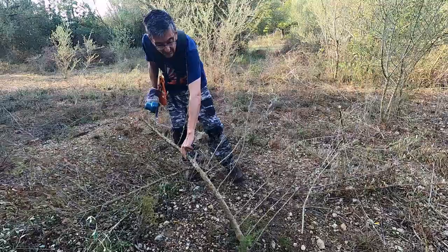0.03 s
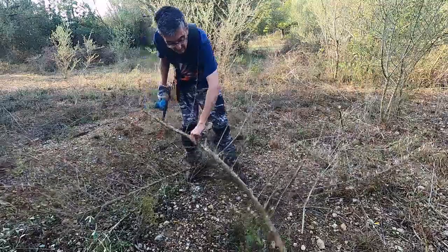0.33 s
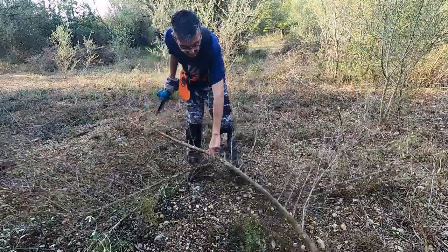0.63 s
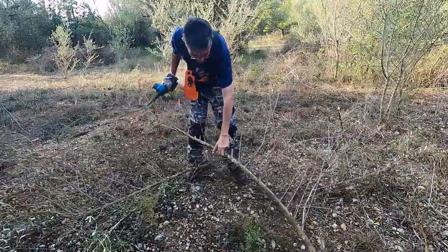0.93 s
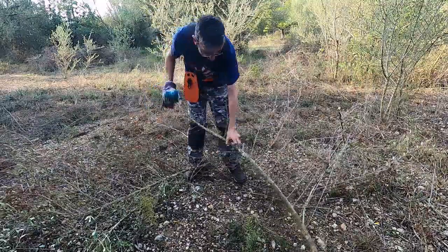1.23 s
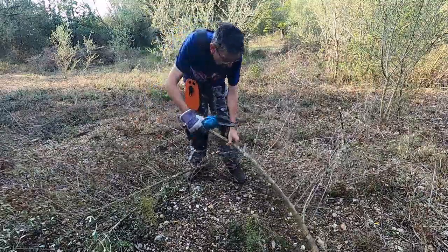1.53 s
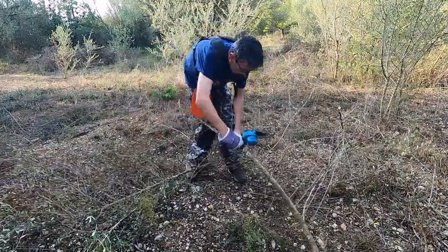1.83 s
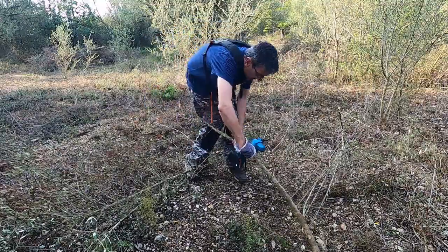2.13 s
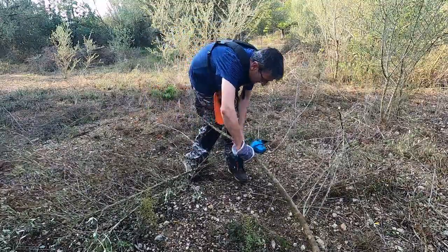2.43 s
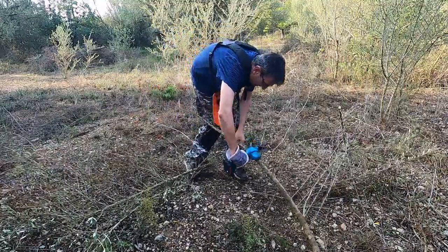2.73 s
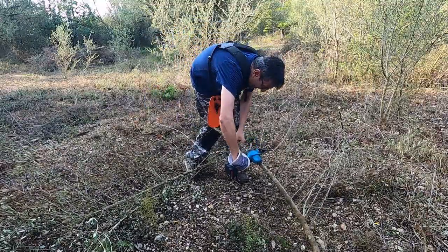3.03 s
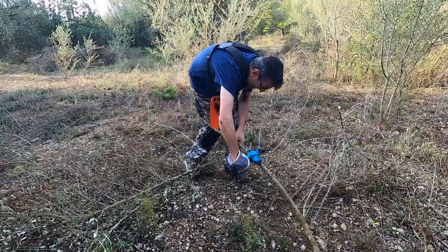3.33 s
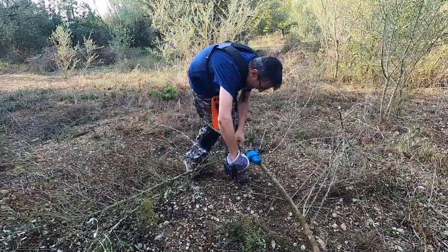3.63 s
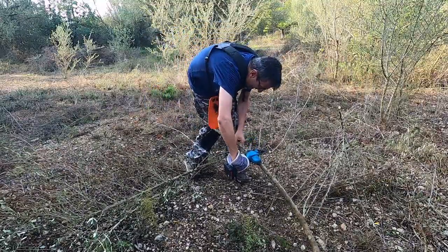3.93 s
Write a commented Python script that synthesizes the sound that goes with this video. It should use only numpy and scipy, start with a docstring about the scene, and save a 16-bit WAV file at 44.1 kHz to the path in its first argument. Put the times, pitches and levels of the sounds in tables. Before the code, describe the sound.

Battery mini chainsaw whirring, then chattering into wood, following rustling brush and snapping twigs.

```python
"""Wind rumbles on the microphone and far leaves hiss; dry brush crackles, twigs snap, small birds call.
A boot crunches into soil. A battery mini chainsaw spins up and runs free: links rattle along the
ringing bar over a sprocket tone and a gear whine. Then it sags as its teeth chatter into a branch,
now and then catching hard with a clank and a knock."""
import sys
import numpy as np
from scipy import signal
from scipy.fft import rfft, irfft
from scipy.io import wavfile

SR = 44100
rng = np.random.default_rng(int(sys.argv[2]) if len(sys.argv) > 2 else 0)


def dump(signal):
    """Clip the signal to [-1, 1] and save it as 16-bit WAV at the path in sys.argv[1]."""
    limited = np.clip(np.atleast_2d(signal).T, -1, 1)
    pcm = np.round(limited * 32767).astype(np.int16)
    wavfile.write(sys.argv[1], SR, pcm)


N = 176400
T, HZ = np.arange(N) / SR, np.fft.rfftfreq(N, 1 / SR)
EDGE_HZ = 15850


def amp(db):
    """dB to gain."""
    return 10 ** (np.asarray(db) / 20)


def unit(x):
    """Scale to rms 1."""
    return x / np.sqrt(np.mean(x ** 2) + 1e-20)


def peaking(x, db):
    """Scale to a peak level."""
    return amp(db) * x / abs(x).max()


def curve(points):
    """Interpolate (t/s, value) rows."""
    return np.interp(T, *np.transpose(points))


def swell(centre_s, half_s):
    """Gaussian envelope, 1/e at half_s from the centre."""
    return np.exp(-((T - centre_s) / half_s) ** 2)


def spectrum(points, column=1, hz=HZ):
    """Interpolate (f/Hz, values) rows over log frequency."""
    table = np.transpose(points)
    return np.interp(np.log(hz + 1), np.log(table[0]), table[column])


def colour(x, points, size=4096):
    """Minimum-phase filter from (f/Hz, level/dB) rows; keeps the power of white noise."""
    gain = amp(spectrum(points, hz=np.fft.rfftfreq(size, 1 / SR)))
    cepstrum = irfft(np.log(gain))
    cepstrum[1:size // 2] *= 2
    cepstrum[size // 2 + 1:] = 0
    impulse = irfft(np.exp(rfft(cepstrum)))
    return signal.fftconvolve(x, impulse / np.linalg.norm(impulse))[:N]


def resonate(x, hz, width_hz):
    """Unity-gain resonance; hz may vary."""
    carrier = np.exp(2j * np.pi * np.cumsum(hz * np.ones(len(x))) / SR)
    pole = np.exp(-np.pi * width_hz / SR)
    return 2 * (carrier * signal.lfilter([1 - pole], [1, -pole], x / carrier + 1e-18)).real


def drift(hz):
    """Low-passed noise, rms 1."""
    return unit(irfft(rfft(rng.standard_normal(N)) / (1 + (HZ / hz) ** 4), N))


def add(mix, start_s, sound):
    """Mix in at start_s."""
    part = mix[max(round(start_s * SR), 0):][:len(sound)]
    part += sound[:len(part)]


def stereo_noise(points, side):
    """Coloured mid/side noise."""
    mid, apart = rng.standard_normal((2, N))
    return np.array([colour(mid + sign * side * apart, points) for sign in (1, -1)])


WIND_SPECTRUM = [(15, -9), (42, 3.5), (75, -4), (135, -5.5), (320, -24), (3000, -73.5)]  # rumble: f/Hz, level/dB
WIND_LEVEL = [(0, -43.5), (1.4, -43.5), (1.62, -48), (4, -48.5)]  # wind strength: t/s, relative level/dB
def wind(gust_db=2):
    """Gusts rumble on the microphones, slightly louder on the left than on the right."""
    rumble = stereo_noise(WIND_SPECTRUM, side=0.15)
    return rumble * amp(curve(WIND_LEVEL) + gust_db * drift(6.6)) * amp([[.7], [-.7]])


LEAF_SPECTRUM = [(780, -3), (1050, 4), (1700, -1.5), (3500, -13), (6000, -17.5), (8500, -34), (15000, -43)]  # leaf wash: f/Hz, level/dB
LEAF_LEVEL = [(.85, -57.5), (1.45, -48.5), (1.66, -55), (1.9, -50)]  # its swells: t/s, level/dB
def leaves(flicker_db=0.98):
    """Far leaves merge into a wide wash."""
    return stereo_noise(LEAF_SPECTRUM, side=0.45) * amp(curve(LEAF_LEVEL) + flicker_db * drift(25))


RUSTLES = [(0.056, 0.03, -51), (0.288, 0.3, -54.5), (0.644, 0.095, -59), (1.02, 0.016, -46),
           (1.208, 0.011, -52), (1.774, 0.056, -52)]  # brush dragged or trodden on: centre t/s, half-width/s, level/dB
BRUSH_SPECTRUM = [(400, -8), (1400, 4), (5500, -6), (8500, -19.5), (15000, -32)]  # dry crackle: f/Hz, level/dB
def brush(crackles_per_s=800, spread_db=4.5):
    """Dry stalks crackle in short swells."""
    grains = (rng.random(N) < crackles_per_s / SR) * rng.choice([-1, 1], N)
    grains = grains * amp(spread_db * rng.exponential(1, N).clip(0, 4))
    envelope = sum(amp(db) * swell(s, half_s) for s, half_s, db in RUSTLES)
    return colour(unit(grains) * envelope, BRUSH_SPECTRUM)


SNAPS = [(0.074, -24, 527, -2.5, -11), (0.078, -32, 530, 1, -13), (0.157, -33, 1100, -9, -16),
         (0.284, -29.5, 1050, 11.5, -2), (0.368, -33, 2270, -24, -10), (0.376, -27, 2540, -37, -6),
         (1.299, -23, 2620, -16, -8.5), (1.518, -33.5, 1300, -4, -13), (1.754, -28, 595, 2, -2),
         (1.824, -31, 885, 3.5, -11), (2.103, -32, 1100, -9.5, -7)]  # twigs snapping: t/s, peak/dB, ring f/Hz, bass/dB, treble/dB
TICKS = [(0.258, -32.5), (0.348, -40.5), (0.418, -37), (0.811, -37.5), (1.796, -35.5), (1.829, -51),
         (1.876, -46), (2.045, -41.5)]  # thin stalks breaking: t/s, peak/dB
STALK_SPECTRUM = [(1500, -10), (5200, 6.5), (8500, -9.5), (15000, -22.5)]  # stalk tick: f/Hz, level/dB
def twigs(strain_s=.003, crack_s=0.0014, shed_s=0.01, splinter_db=-17, ring_db=10):
    """A bent twig splinters, cracks, rings and sheds more splinters. Thin stalks only tick."""
    out = np.zeros(N)
    t = T[:SR // 10] - T[SR // 20]  # zero at the crack

    def fracture():
        crack, splinters = rng.standard_normal((2, len(t)))
        crack = np.sign(crack) * np.exp(-abs(t) / crack_s) * (t >= 0)
        splinters = unit(splinters ** 3) * np.exp(-abs(t) / np.where(t < 0, strain_s, shed_s))
        return crack + amp(splinter_db) * splinters
    for s, db, ring_hz, bass, treble in SNAPS:
        burst = fracture()
        burst += amp(ring_db) * resonate(burst, ring_hz, width_hz=140)
        shape = [(650, bass), (1450, 0), (3400, treble - 3), (5200, treble), (EDGE_HZ, treble - 36)]
        add(out, s + crack_s + t[0], peaking(colour(burst, shape), db))
    for s, db in TICKS:
        add(out, s + crack_s + t[0], peaking(colour(fracture(), STALK_SPECTRUM), db))
    return out


CALLS = [(.095, 0.051, 6600, 5400, -60), (.32, .033, 6000, 5650, -58), (0.469, 0.042, 6800, 6400, -53),
         (0.926, 0.046, 6150, 5650, -61), (1.124, 0.033, 4000, 4300, -53.5),
         (1.439, 0.08, 1740, 1860, -49.5)]  # bird calls: t/s, length/s, start f/Hz, end f/Hz, level/dB
def birds():
    """Thin far whistles, one wavering glide each."""
    out = np.zeros(N)
    waver = 1 + .018 * drift(150)
    for s, length_s, from_hz, to_hz, db in CALLS:
        progress = np.clip((T - s) / length_s, 0, 1)
        hz = (from_hz + (to_hz - from_hz) * progress) * waver
        out += amp(db) * np.sin(np.pi * progress) * np.sin(2 * np.pi * np.cumsum(hz) / SR)
    return out


SOIL_SPECTRUM = [(330, 4), (950, -3.5), (4000, -42)]  # trodden soil: f/Hz, level/dB
def boot(level_db=-43.5):
    """A boot settles into loose soil with a dull crunch."""
    grit = unit(rng.standard_normal(N) ** 3)
    return colour(grit * amp(level_db) * swell(centre_s=1.785, half_s=0.038), SOIL_SPECTRUM)


SAW_ON_S, SPIN_UP_S, CUT_S, LOAD_S = 2.166, 0.3, 2.925, 0.18
LINK_RATE = [(2.12, 151), (2.17, 324), (2.24, 330), (2.33, 390), (2.43, 415), (2.56, 425), (2.7, 432),
             (2.93, 433.5), (3.09, 396), (3.19, 346), (3.5, 326)]  # links passing the sprocket: t/s, f/Hz
def sprocket_travel(flutter=.001):
    """Running count of links as the sprocket spins up, then sags."""
    return np.cumsum(curve(LINK_RATE) * (1 + flutter * drift(20))) / SR


def load():
    """0 running free, 1 in the cut."""
    return np.clip((T - CUT_S) / LOAD_S, 0, 1)


def link_clicks(links, jitter):
    """One click of random sign per link; jitter in links."""
    count = np.floor(np.maximum.accumulate(links + jitter * drift(300)))
    return np.diff(count, prepend=0).clip(0, 1) * rng.choice([-1, 1], N)


BAR_MODES = [(1950, 1946), (2250, 2450), (2620, 2920), (3400, 3500)]  # bar resonances: free f/Hz, gripped f/Hz
SAW_SPECTRUM = [(260, -27), (460, -3), (750, -1), (1100, -6), (1340, -3.5), (1650, -7.5), (1900, -2),
                (3450, -3), (4000, -5.5), (4900, -3.5), (6400, -15.5), (7400, -17.5), (8200, -24),
                (12000, -26.5), (15800, -39)]  # chain and housing: f/Hz, level/dB
def bar(force, grip, width_hz=100, ring_db=-1.5):
    """The steel bar rings; its modes wander, and the upper ones rise with the wood's grip."""
    wander = 1 + 0.027 * drift(6.2)[:len(force)]
    modes_hz = [(free + (gripped - free) * grip) * wander for free, gripped in BAR_MODES]
    ring = sum(resonate(force, hz, width_hz) for hz in modes_hz)
    return colour(force + amp(ring_db) * ring, SAW_SPECTRUM)


CLATTER = [(2.13, -42), (2.135, -41.5), (2.168, -29), (2.24, -26.5), (2.95, -26), (3.4, -27.5)]  # chain force on the bar: t/s, level/dB
def chain(links, strike_share=0.21, spread_db=3, surge_depth=0.12):
    """Links strike the sprocket and rattle along the bar, surging at the link rate."""
    strikes = link_clicks(links, jitter=.06) * amp(spread_db * rng.standard_normal(N))
    strikes /= strikes[T > SAW_ON_S].std()
    rattle = unit(rng.standard_normal(N) * (1 + surge_depth * np.cos(2 * np.pi * links)))
    force = np.sqrt(strike_share) * strikes + np.sqrt(1 - strike_share) * rattle
    return bar(force * amp(curve(CLATTER)) * (T > CLATTER[0][0]), load())


TONES = [(1, -33.5), (5 / 6, -50.5), (5, -41)]  # free-running drive: multiple of link rate, level/dB
def sprocket_tones(links, load_db=-19, waver_db=1):
    """The sprocket's tones grow during spin-up and sink under load."""
    spin_up = np.clip((T - SAW_ON_S) / SPIN_UP_S, 0, 1)
    tones = np.sqrt(2) * sum(amp(db) * np.sin(2 * np.pi * k * links) for k, db in TONES)
    return tones * spin_up * amp(load_db * load() + waver_db * drift(11))


HOUSING_MODES = [(3560, -40), (3800, -35), (4400, -34)]  # housing resonances: f/Hz, level/dB
def gear_whine(links, cycles_per_link=61 / 6, width_hz=230, waver_db=2):
    """The gear whine swells where the housing resonates and dies in the cut."""
    gear_hz = cycles_per_link * curve(LINK_RATE)
    housing = sum(amp(db) / (1 + (2 * (gear_hz - hz) / width_hz) ** 2) for hz, db in HOUSING_MODES)
    whine = np.sqrt(2) * np.sin(2 * np.pi * cycles_per_link * links)
    return whine * housing * (T > SAW_ON_S) * (1 - load()) * amp(waver_db * drift(43))


PRESSURE = [(2.88, -80), (2.95, -37), (3.09, -29.5), (3.3, -31.5), (3.45, -34.5), (3.51, -30), (3.7, -30.5)]  # tooth force on the wood: t/s, level/dB
WOOD_SPECTRUM = [(100, -19.5), (380, -2.5), (690, -3.5), (1050, -8), (1340, -2.5), (4000, -37)]  # branch under the teeth: f/Hz, level/dB
def cutting(links, bite_chance=.26, spread_db=3.5, tear_s=0.0032, knock_gain=0.3, wood_db=-8.5):
    """Some passing teeth bite: each shakes the bar, knocks the branch and tears a chip."""
    bites = link_clicks(links, jitter=.25) * (rng.random(N) < bite_chance)
    bites *= amp(spread_db * rng.standard_normal(N).clip(-2, 1))
    tails = signal.lfilter([1], [1, -np.exp(-1 / (tear_s * SR))], bites)
    tearing = tails * rng.standard_normal(N)
    force = unit(tearing) + knock_gain * unit(bites)
    force /= force[T > CUT_S].std()
    force *= amp(curve(PRESSURE)) * (T > PRESSURE[0][0])
    return bar(force, load()) + amp(wood_db) * colour(force, WOOD_SPECTRUM)


CATCHES = [(2.943, -11, -20), (3.066, -19, -20), (3.105, -17.5, -26), (3.322, -19, -16),
           (3.364, -16.5, -19.5), (3.411, -18, -31), (3.424, -12, -35), (3.59, -19.5, -18),
           (3.768, -14, -19.5), (3.863, -13.5, -23)]  # tooth catches: t/s, clank peak/dB, knock peak/dB
def catches(decay_s=0.0034):
    """A tooth catches hard: the bar clanks and the branch knocks."""
    out, t = np.zeros(N), T[:SR // 20]
    for s, clank_db, knock_db in CATCHES:
        jolt = np.exp(-t / decay_s) * rng.standard_normal(len(t))
        clank = peaking(bar(jolt, grip=1), clank_db)
        knock = peaking(colour(jolt, WOOD_SPECTRUM), knock_db)
        add(out, s, clank + knock)
    return out


MIC_PAIR = [(815, 0.011, -2), (2400, 0.15, 0), (4900, 0.24, -0.2), (9800, 0.72, -4.5)]  # stereo response: f/Hz, scattered share, left minus right/dB
def microphones(direct, draw_scattered, left_lag_s=3.9e-5, echo_db=-16.5, echo_t60_s=.25):
    """Direct sound reaches the right port first; scattered treble and tree echo differ per port."""
    share = spectrum(MIC_PAIR).clip(0, 1)
    lag_rad = np.pi * HZ * left_lag_s
    ports = []

    def through(x, response):
        impulse = np.roll(irfft(response, N), SR // 20)[:SR // 10]
        return signal.fftconvolve(x, impulse)[SR // 20:][:N]
    for sign in (1, -1):
        gain = amp(sign * spectrum(MIC_PAIR, column=2) / 2)
        gain /= np.sqrt((1 - share) * np.cos(lag_rad) ** 2 + share / 2)  # holds the mono level
        port = through(direct, gain * np.sqrt(1 - share) * np.exp(-1j * sign * lag_rad))
        port += through(draw_scattered(), gain * np.sqrt(share))
        trees = rng.standard_normal(SR // 2) * amp(-60 * T[:SR // 2] / echo_t60_s)
        echo = signal.fftconvolve(port, trees / np.linalg.norm(trees))[:N]
        ports.append(port + amp(echo_db) * echo)
    return np.array(ports)


def scene(ease_db=-6.5):
    """One sprocket speed drives chain, tones and teeth, amid brush, birds and wind."""
    links = sprocket_travel()
    ease = amp(ease_db * swell(centre_s=3.452, half_s=0.021))  # the saw briefly eases off

    def noises():
        return ease * (chain(links) + cutting(links)) + catches() + twigs() + brush() + boot()
    direct = noises() + sprocket_tones(links) + gear_whine(links) + birds()
    return microphones(direct, noises) + wind() + leaves()


def record(dry):
    """Low-pass at EDGE_HZ."""
    lowpass = signal.firwin(511, EDGE_HZ, window=("kaiser", 9), fs=SR)
    return signal.oaconvolve(dry, lowpass[None], "same")


dry = scene()
out = record(dry)
dump(out)
```